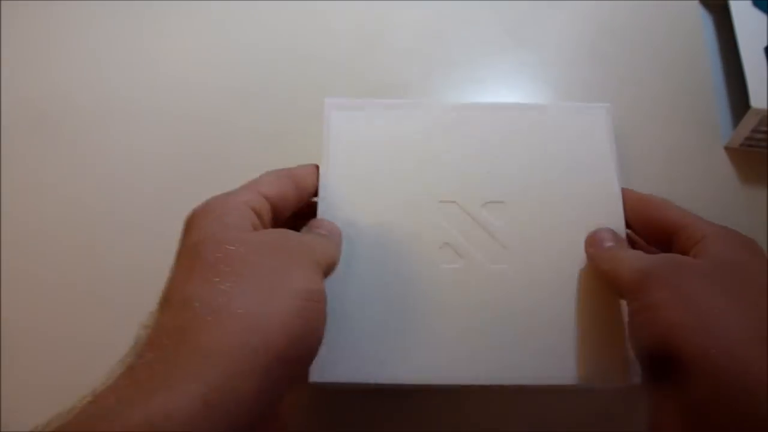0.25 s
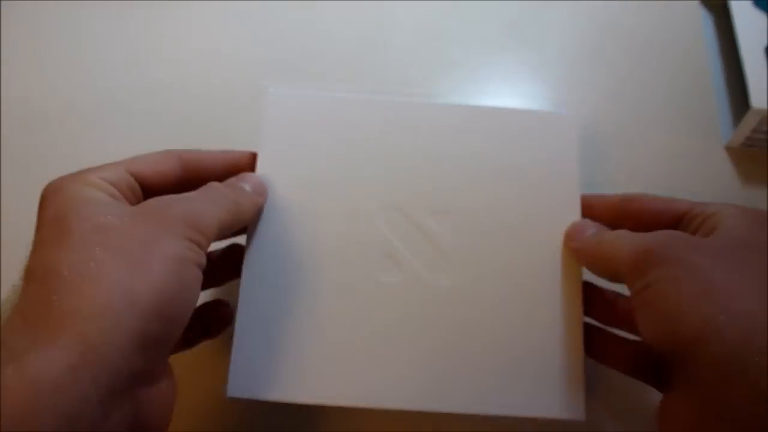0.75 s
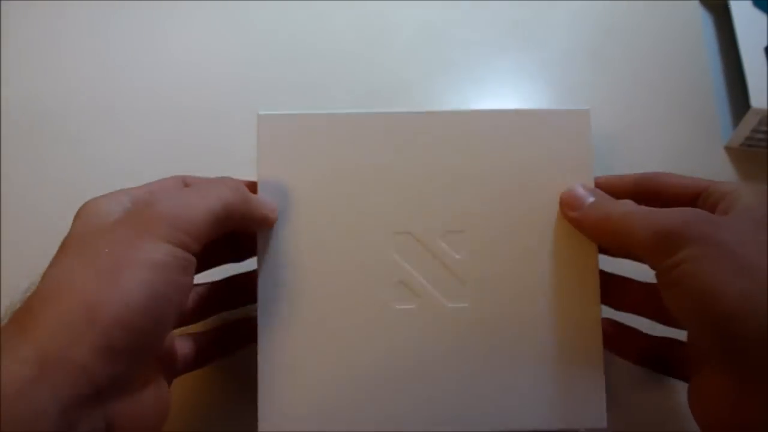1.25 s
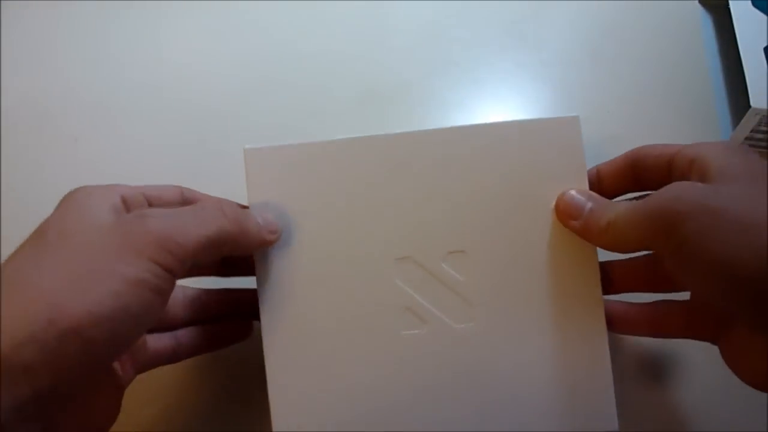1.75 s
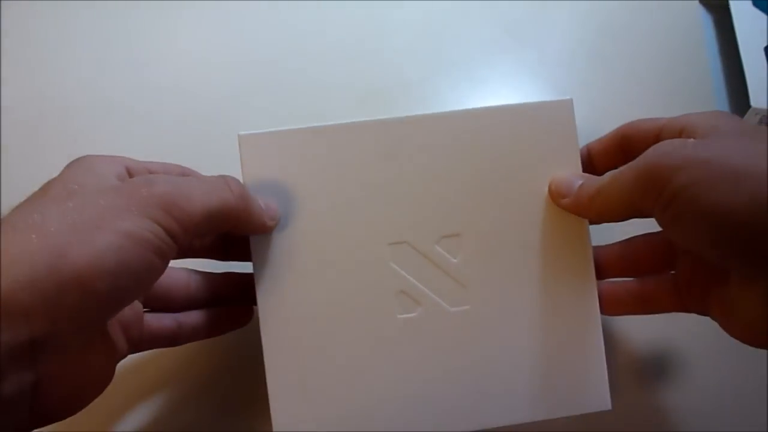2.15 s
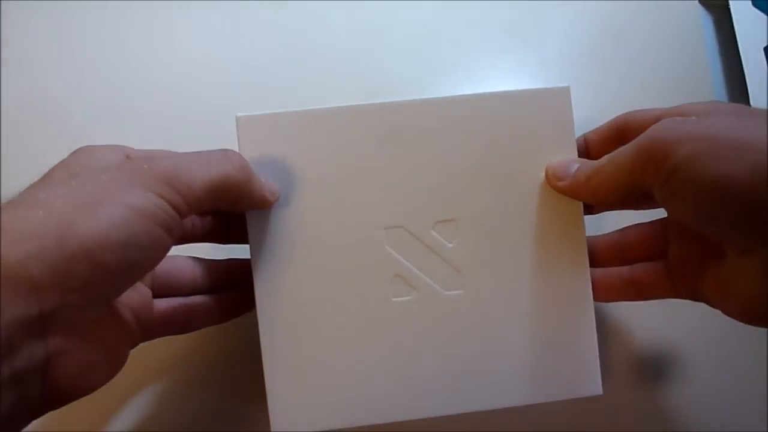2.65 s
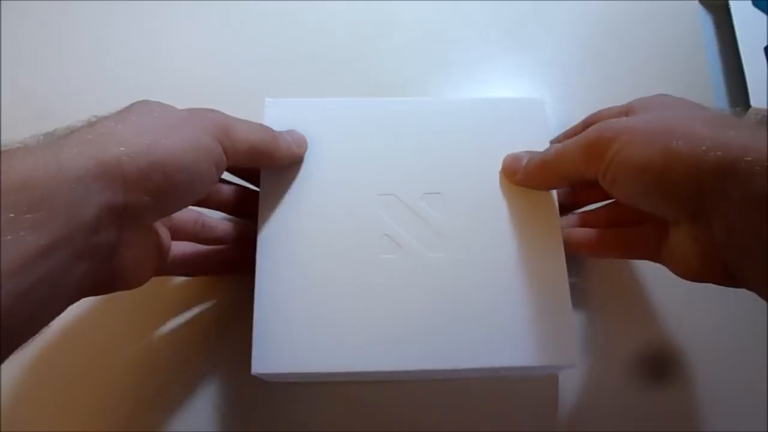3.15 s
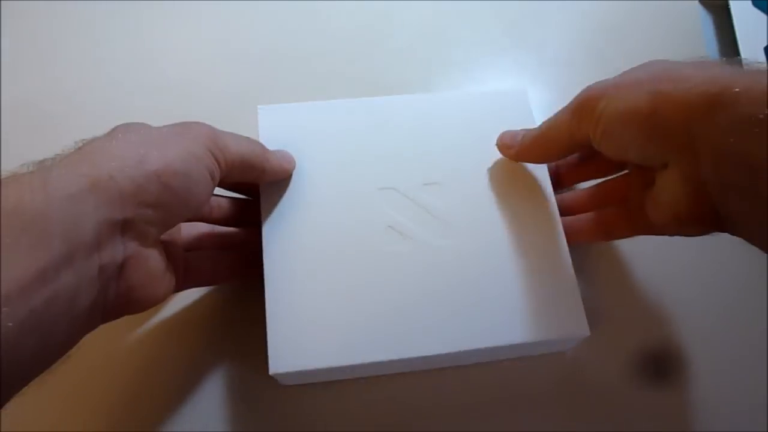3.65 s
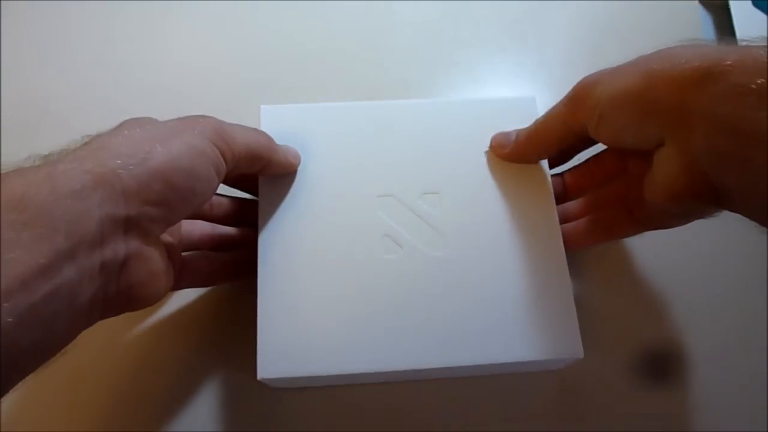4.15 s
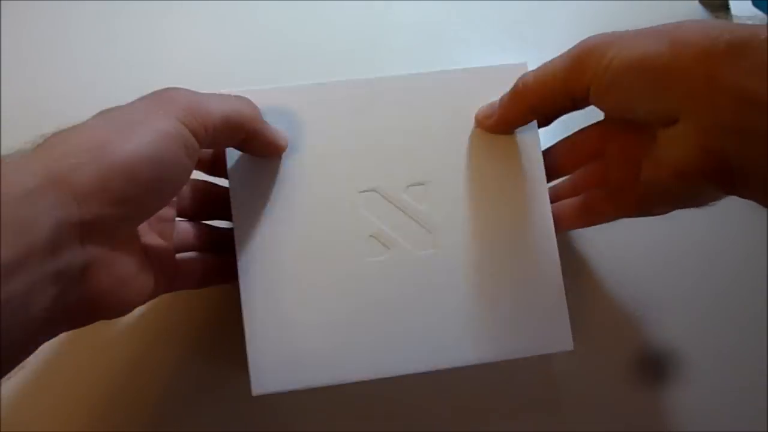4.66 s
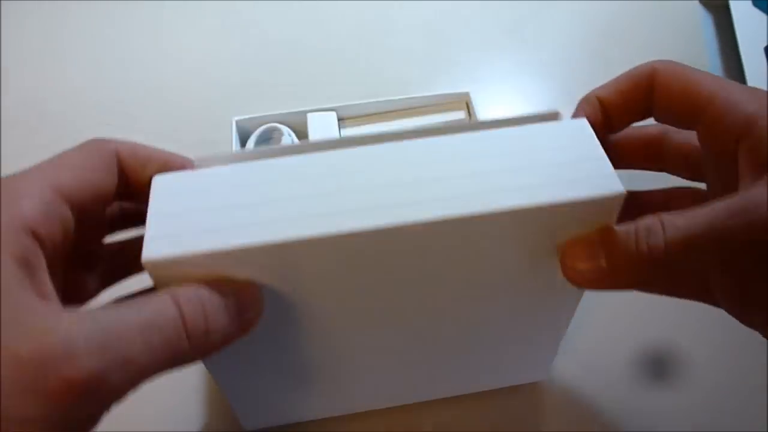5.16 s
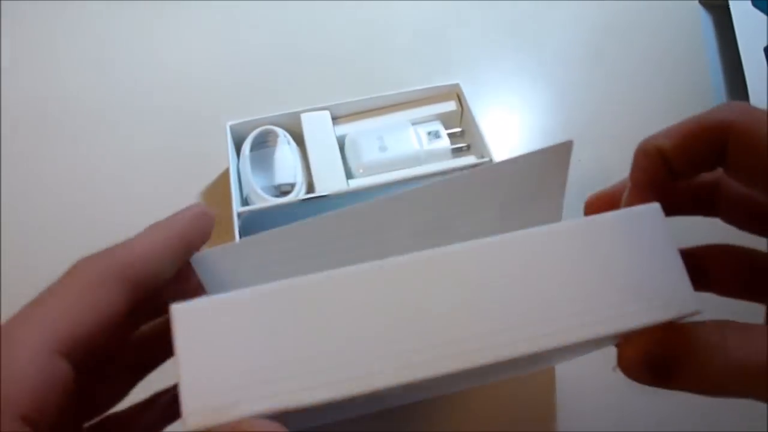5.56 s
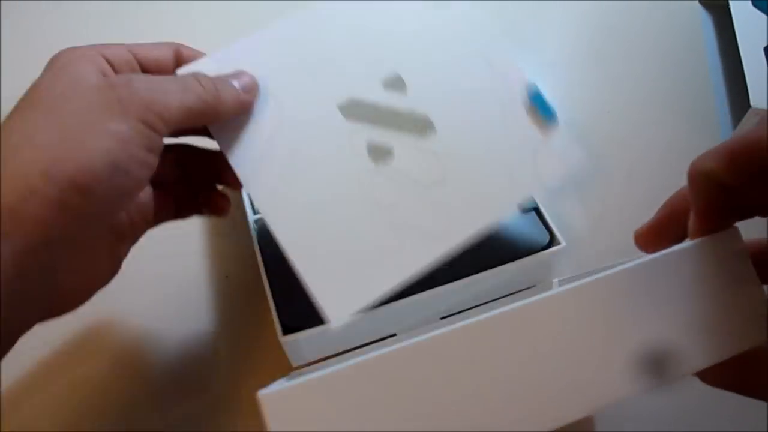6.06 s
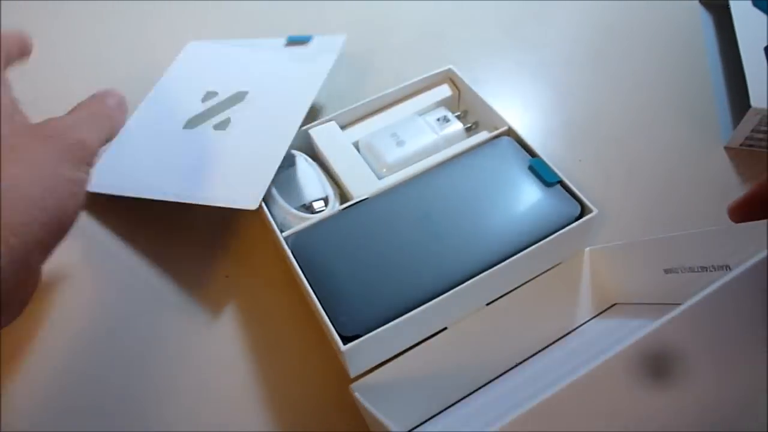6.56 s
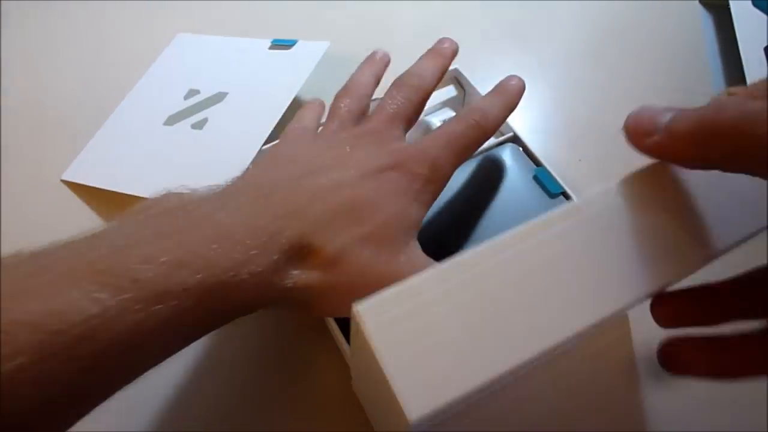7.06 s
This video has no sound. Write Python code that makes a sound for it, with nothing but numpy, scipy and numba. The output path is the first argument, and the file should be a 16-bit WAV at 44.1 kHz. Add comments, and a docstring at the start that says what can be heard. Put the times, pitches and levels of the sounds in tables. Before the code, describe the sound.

A close, narrow-band sound of a stiff cardboard box handled on a table in a small, dry room, with faint steady hiss throughout. A brief papery scuff opens, and a sharp edge knock lands at 0.14 s. From 0.7 to 1.4 s come clustered hollow knocks, short rubs and soft low bumps against the table. From 1.5 to 2.8 s it is quieter: faint card brushing and a few isolated taps. A firm knock and bump at 3.1 s lead to a busy crackle around 3.4-3.6 s, then lighter ticks. At 4.2 s a bump and rubbing begin the main effort: loud, boxy cracks and rough scraping from 4.45 to 4.95 s as the lid slips free. Afterwards sparse taps ring slightly higher, with thin card rustles and scuffs around 6.0-6.7 s, ending in soft knocks near 6.9 s and light rubbing.

```python
"""A stiff cardboard box knocks and scrapes on a table as hands work its snug lid off, close to a small microphone.
Knocks and slips ring the box as sets of damped modes: its hollow, walls, edges and thin card surface.
Between them card rubs on card: dense random catches of fibres shake the same modes.
The base bumps softly on the table, and a small room answers briefly over a faint steady hiss of shaped noise."""
import sys
import numpy as np
from scipy import signal
from scipy.fft import rfft, irfft
from scipy.io import wavfile
from scipy.ndimage import uniform_filter1d
from numba import njit

SR = 44100
rng = np.random.default_rng(int(sys.argv[2]) if len(sys.argv) > 2 else 0)


def master_out(mix):
    """Clip the mix to full scale and print it as 16-bit PCM to the path in sys.argv[1]."""
    frames = np.transpose(np.atleast_2d(mix))
    ceiling = np.clip(frames, -1, 1)
    pcm = np.round(ceiling * 32767).astype(np.int16)
    wavfile.write(sys.argv[1], SR, pcm)


def convert_level_to_amplitude(level_db):
    """Map a level in decibels to its linear amplitude factor."""
    exponent = np.asarray(level_db, float) / 20
    return 10 ** exponent


N = 321930  # length of the sound in samples


def unit(x):
    """Scales a signal to rms 1."""
    return x / np.sqrt(np.mean(x ** 2))


def walk(rate):
    """Slowly wandering random values of rms 1: each is held 1 / rate s, then smoothed twice."""
    hold = int(SR / rate)
    steps = np.repeat(rng.standard_normal(N // hold + 1), hold)
    smooth = uniform_filter1d(uniform_filter1d(steps, hold), hold)
    return unit(smooth[:N])


def ring(x, hz, width):
    """One damped mode, a tone that dies away; a unit blow starts it at amplitude 1."""
    decay, turn = np.exp(-np.pi * width / SR), 2 * np.pi * hz / SR
    return signal.lfilter([0, np.sin(turn)], [1, -2 * decay * np.cos(turn), decay * decay], x)


@njit
def bent_ring(x, hz, width):
    """A damped mode whose pitch moves from sample to sample."""
    y, state, decay = np.empty(len(x)), 0j, np.exp(-np.pi * width / SR)
    for i in range(len(x)):
        state = state * decay * np.exp(2j * np.pi * hz[i] / SR) + x[i]
        y[i] = state.imag
    return y


# Tone colour of the hiss: (frequency [Hz], relative level per Hz [dB])
HISS_COLOUR = [(35, -67), (60, -30), (326, 1), (775, 8), (929, 18), (1340, 10.5), (4040, 6.5), (6430, -5),
               (7400, -62.5), (9620, -65)]
HISS_DB = -53  # rms level of the whole hiss


def hiss():
    """Steady noise of room and microphone: white noise with its spectrum reshaped."""
    hz, db = np.transpose(HISS_COLOUR)
    f = np.maximum(np.arange(N // 2 + 1) * SR / N, 1)
    colour = convert_level_to_amplitude(np.interp(np.log(f), np.log(hz), db))
    noise = irfft(rfft(rng.standard_normal(N)) * colour, N)
    return convert_level_to_amplitude(HISS_DB) * unit(noise)


ROOM_T60_S, ROOM_DB, ROOM_HZ = 0.11, -16, 2950  # time to fade by 60 dB, level, treble limit


def room(x):
    """Many blurred echoes: a short, dull tail of fading noise that begins a few ms late."""
    t = np.arange(int(.4 * SR)) / SR
    tail = rng.standard_normal(len(t)) * np.exp(-np.log(1000) * t / ROOM_T60_S) * (t > .004)
    tail = signal.lfilter(*signal.butter(1, ROOM_HZ, fs=SR), tail)
    return convert_level_to_amplitude(ROOM_DB) * signal.fftconvolve(x, tail / np.linalg.norm(tail))[:N]


# Soft bumps of the tray's base on the table: (time [s], level [dB])
BASE_BUMPS = [(0.245, -23), (0.766, -23), (1.049, -15), (1.252, -21.5), (3.076, -35.5), (3.136, -19.5),
              (4.215, -15), (5.417, -27), (6.032, -33), (6.194, -35), (6.558, -37)]
BASE_HZ, BASE_WIDTH_HZ, BUMP_S = 339.4, 75, 0.0027  # the base's mode, and how long a push lasts


def bumps():
    """The base rings low; a push spread over a few ms sets it going without a click."""
    s, db = np.transpose(BASE_BUMPS)
    push = np.zeros(N)
    push[(s * SR).astype(int)] = convert_level_to_amplitude(db)
    t = np.arange(int(BUMP_S * SR)) / SR
    swell = np.hanning(len(t)) * np.sin(2 * np.pi * BASE_HZ * t)
    soft_push = np.convolve(push, 2 * swell / np.abs(swell).sum())[:N]
    return ring(soft_push, BASE_HZ, BASE_WIDTH_HZ)


FIBRES_PER_S = 3500.  # average number of catches
FIBRE_SPREAD_DB, SLIP_DB = 5., 2.  # unevenness from catch to catch, and of the stick-slip flurries


def fibres():
    """Dense tiny catches of uneven size, in stick-slip flurries."""
    catch = (rng.random(N) < FIBRES_PER_S / SR) * np.sign(rng.standard_normal(N))
    size_db = FIBRE_SPREAD_DB * rng.standard_normal(N) + SLIP_DB * walk(40)
    return unit(catch * convert_level_to_amplitude(size_db))


# Short strokes of card brushing card: the lid creeping, and rustles and papery scuffs
# before and after it comes off:
# (time [s], length [s], level through the body [dB], level off the surface [dB])
CARD_STROKES = [(0.19, 0.085, -37.5, -46.5), (1.136, 0.022, -36, -44), (1.296, 0.023, -34, -56),
                (1.825, 0.083, -37.5, -53), (2.049, 0.124, -39.5, -57), (2.37, 0.19, -38, -56),
                (2.461, 0.023, -41, -53), (2.609, 0.078, -34.5, -59), (2.735, 0.133, -37, -56),
                (3.557, 0.061, -37, -36), (4.316, 0.13, -27.5, -42.5), (5.29, 0.029, -45, -54.5),
                (5.832, 0.029, -39.5, -46.5), (6.004, 0.036, -35, -43.5), (6.396, 0.029, -39, -40),
                (6.438, 0.09, -54, -45), (6.553, 0.047, -56, -41), (6.655, 0.015, -41, -31.5)]
STROKE_RISE_S, STROKE_FALL_S = 0.023, 0.014


def strokes(t):
    """Loudness of the strokes through body and surface: quick rise, hold, quick fall."""
    out = np.zeros((2, N))
    for s, length, *db in CARD_STROKES:
        rise = (t - s) / STROKE_RISE_S
        fall = 1 + (s + length - t) / STROKE_FALL_S
        shape = np.clip(np.minimum(rise, fall), 0, 1)
        out = np.maximum(out, shape * convert_level_to_amplitude(np.array(db))[:, None])
    return out


# Card rubbing on card and table: (time [s], level through the body [dB], level off the surface [dB])
RUBBING = [(0.0, -50, -36.5), (0.109, -56, -49), (0.47, -51, -52.5), (0.95, -35, -51.5), (1.28, -46.5, -66),
           (1.589, -50.5, -59), (2.68, -43, -69.5), (2.88, -47, -59), (3.41, -50, -54), (3.559, -35, -72),
           (3.938, -55.5, -71.5), (4.23, -53, -65.5), (4.46, -28.5, -42.5), (4.509, -30.5, -42.5),
           (4.78, -37, -44), (5.12, -49.5, -54.5), (5.39, -47, -66.5), (5.61, -44.5, -54),
           (6.259, -49, -58.5), (6.95, -49.5, -57), (7.11, -47, -44), (7.3, -47.5, -40)]


def rubbing(t):
    """Loudness of all rubbing through body and surface: a gliding level joined by the strokes."""
    s, body_db, surface_db = np.transpose(RUBBING)
    gliding_db = np.array([np.interp(t, s, body_db), np.interp(t, s, surface_db)])
    return np.hypot(convert_level_to_amplitude(gliding_db), strokes(t))


# Knocks, taps and slips: (time [s], level [dB], depth of hollow over walls [dB],
# brightness of surface over walls [dB], scuffle against the blow [dB])
BOX_KNOCKS = [(0.119, -23.5, -3.5, -8.5, -23), (0.1411, -10, -13.5, -8, -33.5), (0.46, -33.5, -19, -5, -28),
              (0.653, -36.5, -0.5, -4.5, -24.5), (0.715, -31.5, -20, -7.5, -20.5),
              (0.728, -32, -23, -7, -33.5), (0.76, -22, 3, -10, -30), (0.833, -25.5, 2, -23, -35),
              (0.839, -23, 0, -12, -28), (0.873, -30, -8, -6.5, -25.5), (0.899, -16.5, -4.5, -20.5, -32),
              (0.928, -27.5, -3.5, -15.5, -24.5), (0.99, -35.5, -8.5, -24, -22),
              (1.044, -14, -8, -15.5, -37), (1.078, -28.5, -2, -10.5, -30),
              (1.132, -28.5, -4.5, -18.5, -28), (1.25, -36, 8.5, -3, -28.5), (1.395, -24.5, -7, -18, -32),
              (1.405, -12.5, -4, -19, -26), (1.447, -27, 0.5, -10, -25.5), (1.514, -31.5, -1.5, -13, -28),
              (1.975, -34, -3, -20, -25), (2.322, -26.5, -8, -8, -32.5), (2.876, -18, -13, -17.5, -33),
              (3.025, -28, -11, -23, -32), (3.07, -43.5, 4.5, 5.5, -21.5), (3.131, -14.5, 0, -19, -30),
              (3.184, -25, -2.5, -2.5, -30.5), (3.336, -28.5, 0, -8.5, -34), (3.391, -28, -10.5, -13, -33),
              (3.463, -26.5, -9, -7, -28.5), (3.507, -20, -5, -8, -31), (3.533, -25, -25, -2.5, -23.5),
              (3.556, -14.5, -0.5, -16.5, -24.5), (3.575, -25, -16, -6, -16.5),
              (3.657, -29.5, 1.5, -10.5, -20.5), (3.787, -33.5, -3, 1.5, -37),
              (3.924, -31.5, 1, -17.5, -32.5), (4.021, -39, -11.5, -9.5, -22), (4.173, -32.5, -26, -5, -30),
              (4.186, -32.5, -8, -0.5, -32), (4.198, -35, -17, -3, -30), (4.213, -21.5, -0.5, -10.5, -29),
              (4.248, -26, -9, -4, -32), (4.269, -30, 0.5, -11, -21.5), (4.324, -28, -13, -11, -18.5),
              (4.479, -24.5, -1, -2.5, -28), (4.488, -23, -7.5, -3, -25.5), (4.495, -23, -12, -17, -24),
              (4.514, -8.5, 1.5, -1.5, -45.5), (4.572, -30.5, -10, -3, -21.5),
              (4.589, -13, 0.5, -7.5, -38.5), (4.609, -21, 4, -14.5, -25), (4.685, -8, -3.5, -10.5, -37.5),
              (4.813, -23.5, -5.5, -2.5, -32.5), (4.842, -17, -20, -26.5, -34.5),
              (4.899, -26, -3.5, -12, -27.5), (4.926, -8, -7.5, -15, -28), (5.039, -17.5, -38, -16, -33.5),
              (5.147, -25.5, -11, -5.5, -35), (5.358, -30, -36, -9, -22), (5.605, -19, -25, -16, -29),
              (5.634, -34.5, -3.5, -9.5, -28.5), (5.708, -27.5, -21, -6, -31),
              (5.769, -23.5, -48, -7, -34.5), (5.942, -36.5, -19, 2, -30.5), (5.966, -38.5, -10, 5.5, -27),
              (5.985, -27, -15, -1.5, -18.5), (6.008, -27.5, -11, -10.5, -19),
              (6.257, -24.5, -13, 0.5, -24), (6.265, -20.5, -8.5, -6.5, -26),
              (6.390, -32.5, -15, -5, -19.5), (6.457, -43, -15, 1.5, -18), (6.593, -20.5, -20, -10, -28),
              (6.68, -22, -17.5, -5, -26.5), (6.859, -25, -15, -18.5, -25.5), (6.981, -30, -22, -7, -26)]
CONTACT_HZ = 3400  # treble limit of the push
CRUNCH_S, CRUNCH_DB = 0.003, -35  # fade time (to 1/e) and level against the blow
SETTLE_S = 0.033  # fade time of the scuffle (to 1/e)


def blows():
    """A push at each knock, a brief crunch of fibres, then a settling scuffle; also which knock sounds."""
    s, *_, scuffle_db = np.transpose(BOX_KNOCKS)
    at = (s * SR).astype(int)
    which = np.maximum(np.searchsorted(at, np.arange(N), side="right") - 1, 0)
    age = np.abs(np.arange(N) - at[which]) / SR
    crunch = convert_level_to_amplitude(CRUNCH_DB) * np.exp(-age / CRUNCH_S)
    scuffle = convert_level_to_amplitude(scuffle_db)[which] * np.exp(-age / SETTLE_S)
    push = np.zeros(N)
    push[at] = 1
    # card yields under the blow, which dulls the push
    push = signal.lfilter(*signal.butter(2, CONTACT_HZ, fs=SR), push)
    started = np.arange(N) > at[0]
    return push + (crunch + scuffle) * started * fibres(), which


# Knocks that land squarely on an edge: (time [s])
EDGE_KNOCKS = [.141, 4.48, 4.514, 6.008, 6.593, 6.68]
EDGE_ON_DB = 7  # how much more such a knock wakes the edges
EDGE_SHARE = 0.39  # edges take this share of a blow's brightness in dB


def blow_levels():
    """How strongly each knock wakes hollow, walls, edges and surface, in dB; it depends where it lands."""
    knock_s, wall_db, depth_db, bright_db, _ = np.transpose(BOX_KNOCKS)
    edge_on = np.abs(knock_s[:, None] - EDGE_KNOCKS).min(axis=1) < .005
    edge_db = wall_db + EDGE_SHARE * bright_db + EDGE_ON_DB * edge_on
    return wall_db + depth_db, wall_db, edge_db, wall_db + bright_db


GRIP_BEND, GRIP_PER_S = .04, 12.  # typical shift as a share of the pitch, changes per second
PLACE_DB, DRIFT_DB = 2.5, 3.  # spread from knock to knock, and of the damping fingers


def part(modes, push, which, blow_db, catches, rub_gain):
    """One part of the box: blows and rubbing drive the same modes, bent by the changing grip."""
    place_db = PLACE_DB * rng.standard_normal((len(BOX_KNOCKS), len(modes)))
    struck, rubbed = 0, 0
    for k, (hz, width, mode_db) in enumerate(modes):
        bent_hz = hz * (1 + GRIP_BEND * walk(GRIP_PER_S))
        blow = push * convert_level_to_amplitude(blow_db + mode_db + place_db[:, k])[which]
        # neighbouring modes start in opposite directions
        struck = struck + (-1) ** k * bent_ring(blow, bent_hz, float(width))
        # the fingers damp now one mode, now another
        shake = catches * convert_level_to_amplitude(mode_db + DRIFT_DB * walk(13))
        rubbed = rubbed + bent_ring(shake, bent_hz, float(width))
    return struck + unit(rubbed) * rub_gain


SLAP_HZ, SLAP_WIDTH_HZ, SLAP_DB = 1350, 1250, 8  # level over the edges' blow


def slap(push, which, edge_db):
    """The first instant of a blow: one very broad mode that dies at once."""
    return ring(push * convert_level_to_amplitude(edge_db + SLAP_DB)[which], SLAP_HZ, SLAP_WIDTH_HZ)


SHUT_HZ, SHUT_WIDTH_HZ, SHUT_DB = 556, 86, -5  # level against the body's rubbing


def shut_hum(catches, body_rub, opened):
    """The closed box hums on a low, wide note when rubbed."""
    return unit(ring(catches, SHUT_HZ, SHUT_WIDTH_HZ)) * body_rub * (1 - opened) * convert_level_to_amplitude(SHUT_DB)


LID_HZ, LID_WIDTH_HZ = 949, 39
LID_DB, LID_BLOW_DB = -8, -6  # levels against the body's rubbing and the walls' blow


def lid_hum(push, which, wall_db, catches, body_rub, opened):
    """The lifted lid sounds one higher, narrower note: it rings when tapped and hums when rubbed."""
    tapped = ring(push * convert_level_to_amplitude(wall_db + LID_BLOW_DB)[which] * opened, LID_HZ, LID_WIDTH_HZ)
    return tapped + unit(ring(catches, LID_HZ, LID_WIDTH_HZ)) * body_rub * opened * convert_level_to_amplitude(LID_DB)


# Modes of the box, each table: (frequency [Hz], width [Hz], level [dB])
# the hollow, the walls, the stiff edges, the card surface
HOLLOW_MODES = [(310, 130, -11), (348.3, 86, 2), (476.4, 73, 5), (526.5, 79.5, 7), (750, 99, -2)]
WALL_MODES = [(795, 130, -8.5), (938, 107, 0.5), (1060.6, 93, -5), (1209, 77, -8.5)]
EDGE_MODES = [(1440, 260, 4.6), (1585, 370, 10), (1778, 320, 2.6), (2100, 278, 1.6)]
SURFACE_MODES = [(2490, 850, 14.5), (3226, 1340, 17), (3875, 256, 1.5), (4970, 630, -3)]
# the loose thin card inside, which takes over the top once the box is open
INSERT_MODES = [(2400, 910, 15.5), (3260, 1340, 17.5), (4020, 580, 10), (5100, 1470, 5.5)]
HOLLOW_RUB_DB, WALL_RUB_DB = -10.5, -6  # against the body's rubbing
EDGE_RUB_DB = -1  # against the surface's rubbing
LID_OFF_S, LIFT_S = 4.9, 0.13  # when the lid leaves the tray, and how long that takes


def box():
    """All parts of the box, knocked and rubbed; as the lid lifts, surface and hum give way to new ones."""
    t = np.arange(N) / SR
    opened = np.clip((t - LID_OFF_S) / LIFT_S, 0, 1)
    body_rub, surface_rub = rubbing(t)
    push, which = blows()
    hollow_db, wall_db, edge_db, surface_db = blow_levels()
    body_catches, surface_catches = fibres(), fibres()
    hollow = part(HOLLOW_MODES, push, which, hollow_db, body_catches, body_rub * convert_level_to_amplitude(HOLLOW_RUB_DB))
    walls = part(WALL_MODES, push, which, wall_db, body_catches, body_rub * convert_level_to_amplitude(WALL_RUB_DB))
    edges = part(EDGE_MODES, push, which, edge_db, body_catches, surface_rub * convert_level_to_amplitude(EDGE_RUB_DB))
    surface = part(SURFACE_MODES, push, which, surface_db, surface_catches, surface_rub)
    insert = part(INSERT_MODES, push, which, surface_db, surface_catches, surface_rub)
    out = hollow + walls + edges + (1 - opened) * surface + opened * insert
    out = out + slap(push, which, edge_db) + shut_hum(body_catches, body_rub, opened)
    return out + lid_hum(push, which, wall_db, body_catches, body_rub, opened)


def scene():
    """The box and its bumps, the room's answer to both, and the hiss."""
    near = box() + bumps()
    return (near + room(near) + hiss())[None]


def roll_off(x):
    """The treble ends steeply here."""
    return signal.sosfilt(signal.butter(12, 7700, fs=SR, output="sos"), x)


LOW_HZ, TOP_HZ = 226.3, 7050  # the band that the microphone path passes
BASS_LEAK_DB = -34  # a little of the unfiltered sound gets through
FULL_SCALE = .86  # the level that rounded peaks approach


def record(dry):
    """The microphone path drops most of the bass, rounds the hardest knocks and passes only a speech band."""
    high_pass = signal.butter(4, LOW_HZ, "high", fs=SR, output="sos")
    x = signal.sosfilt(high_pass, dry) + convert_level_to_amplitude(BASS_LEAK_DB) * dry
    x = x / (1 + (x / FULL_SCALE) ** 4) ** (1 / 4)
    x = signal.sosfilt(signal.cheby1(10, .5, TOP_HZ, fs=SR, output="sos"), x)
    return roll_off(x)


dry = scene()
out = record(dry)
master_out(out)
```